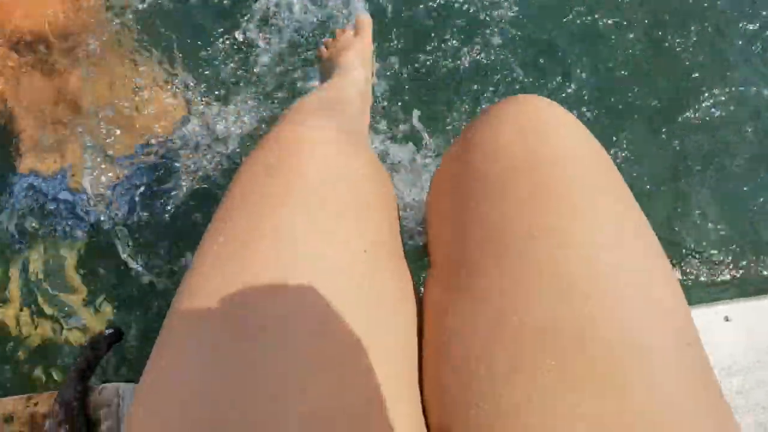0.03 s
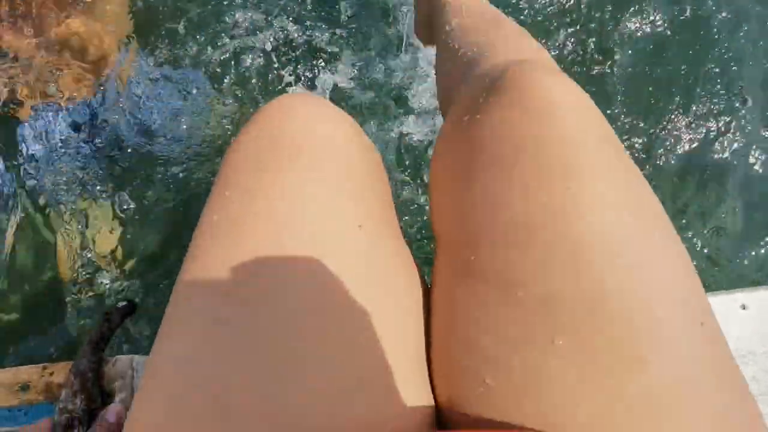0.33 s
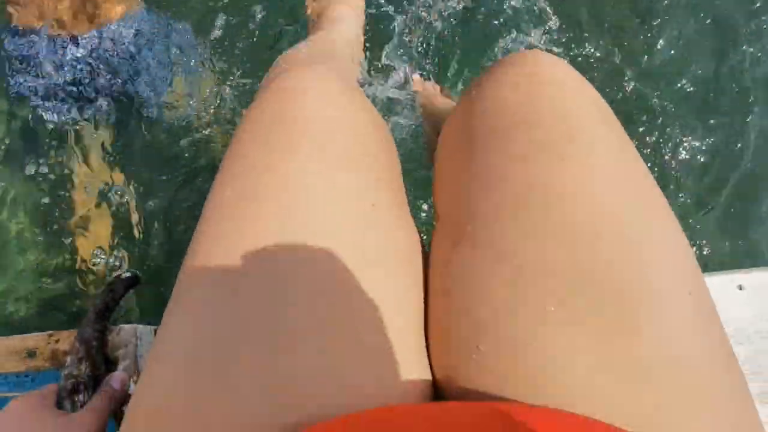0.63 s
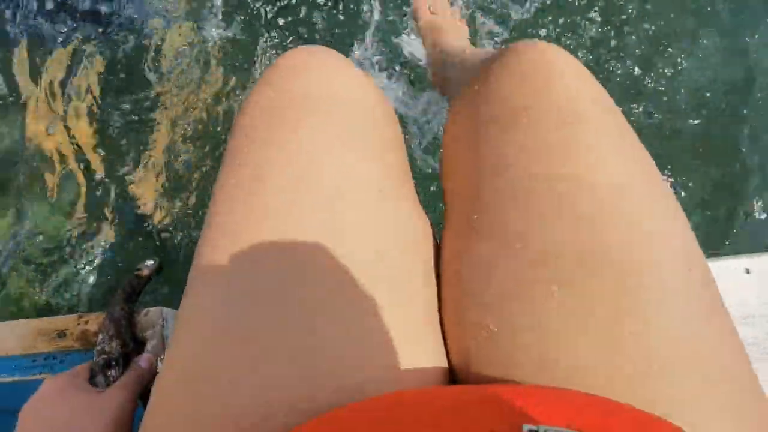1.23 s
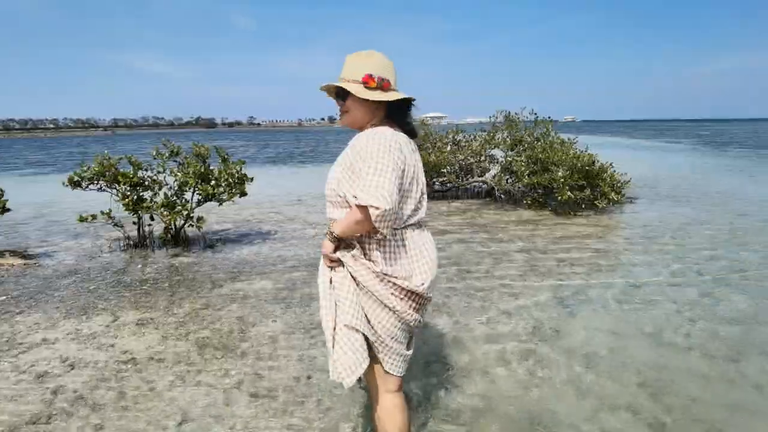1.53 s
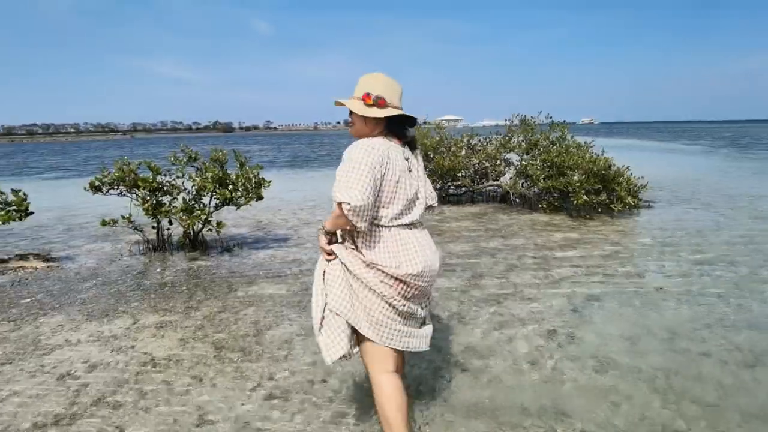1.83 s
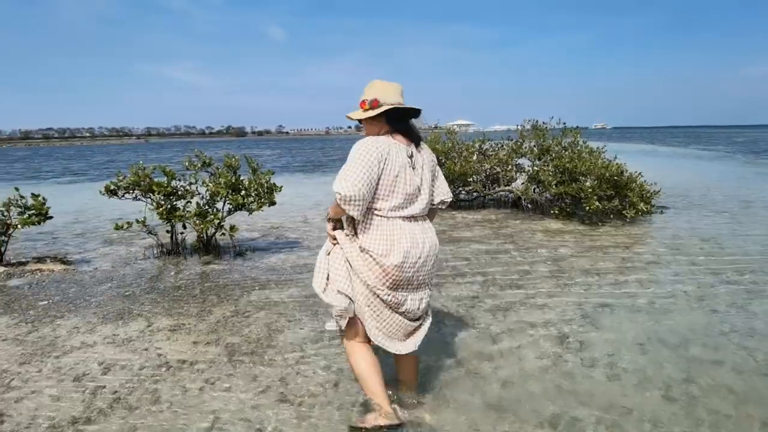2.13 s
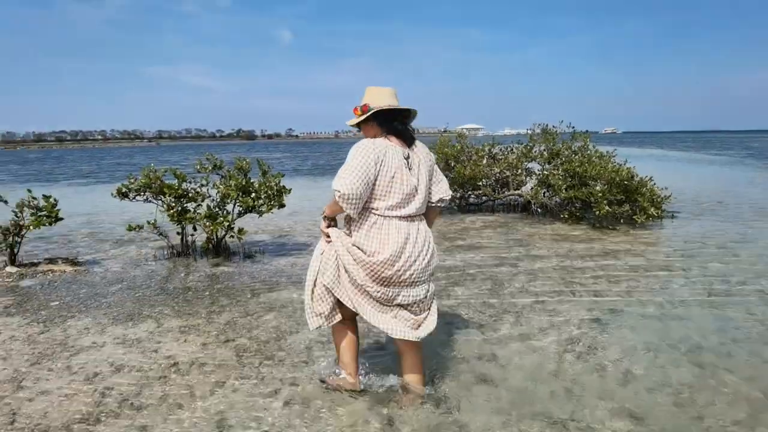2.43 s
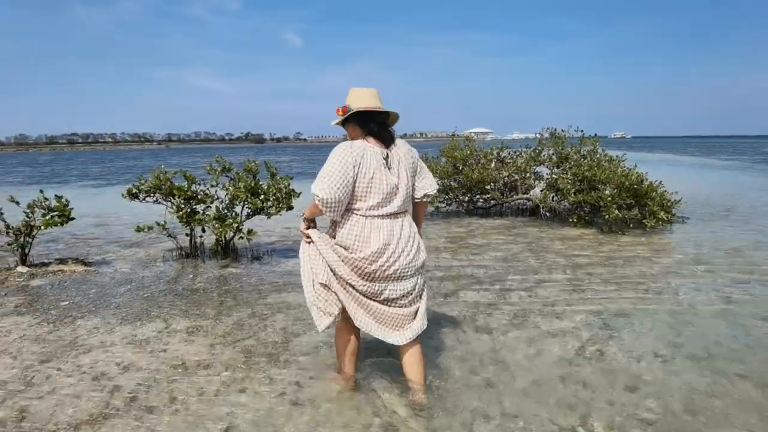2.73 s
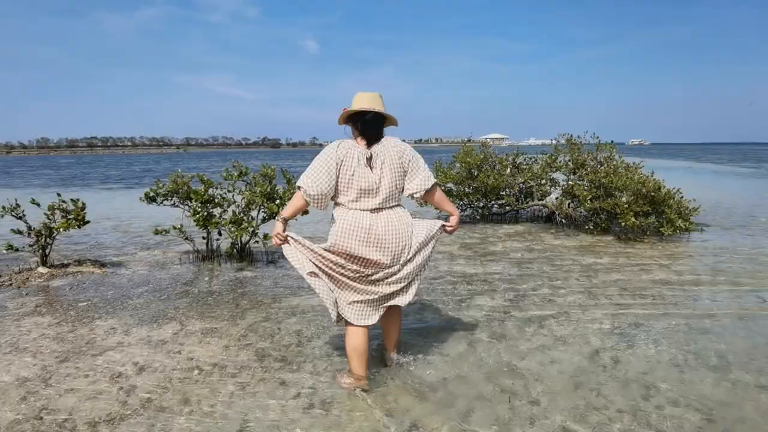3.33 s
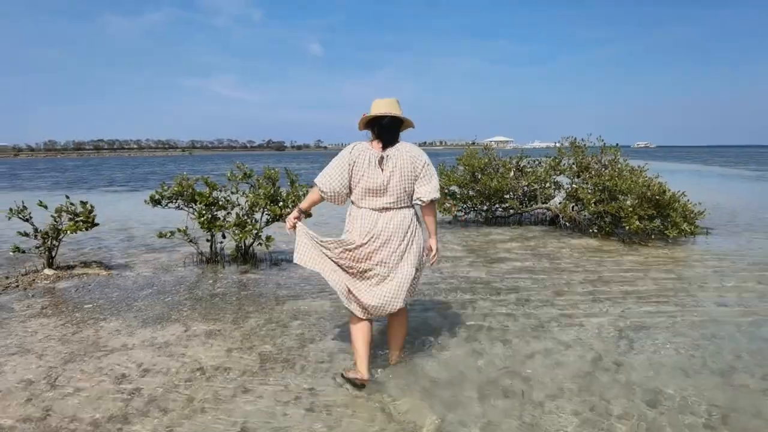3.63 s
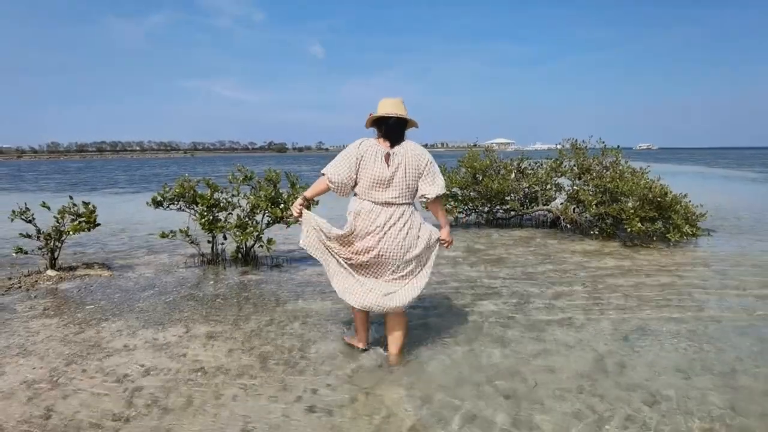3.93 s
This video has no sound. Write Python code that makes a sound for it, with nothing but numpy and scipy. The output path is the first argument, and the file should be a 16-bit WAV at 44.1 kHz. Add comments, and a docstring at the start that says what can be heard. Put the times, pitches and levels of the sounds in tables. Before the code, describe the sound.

Feet kick and splash in water close to the microphone, with spray, slapping drops and deep gulps. The sound then switches to several small boat engines chugging out of step across open water, over a low rumble and soft sea wash.

```python
"""Splashing feet and chugging boats

Feet kick in the water beside a boat: spray flies, drops slap, bubbles ring, plunging legs gulp air. Then the
scene changes: three one-cylinder boat engines chug across open water, each at its own speed, so their beats
drift through one another over a low rumble and the wash of the sea. Late on, the fastest engine fades and a
wading foot plops softly."""
import sys
import numpy as np
from scipy import signal
from scipy.fft import rfft, irfft, next_fast_len
from scipy.io import wavfile
from scipy.ndimage import uniform_filter1d

SR = 44100
rng = np.random.default_rng(int(sys.argv[2]) if len(sys.argv) > 2 else 0)


def to_wav(s):
    """Save 16-bit WAV."""
    ch = np.atleast_2d(s).T  # columns
    pcm = np.round(np.clip(ch, -1, 1) * 32767)  # PCM
    wavfile.write(sys.argv[1], SR, pcm.astype(np.int16))


N = 176400
WATER_END_S, ENGINES_START_S = 1.515, 1.522


# each kick (t/s, spray level/dB, bubbling level/dB, rise/s, hold/s, fall/s)
FOOT_KICKS = [(.0, -30, -34.5, .02, 0.031, 0.088), (0.051, -23.5, -27, .008, 0.01, 0.11),
              (0.211, -25.5, -31.5, 0.036, 0.017, 0.06), (0.25, -20.5, -31.5, .006, 0.0045, 0.025),
              (0.265, -30, -33.5, .03, 0.03, 0.26), (0.56, -23.5, -40.5, 0.011, 0.019, 0.038),
              (0.627, -28.5, -42.5, 0.0068, .006, 0.059), (0.69, -33.5, -37, 0.11, 0.044, 0.056),
              (0.765, -31.5, -41.5, 0.012, 0.025, 0.059), (0.825, -28.5, -34.5, 0.077, 0.057, 0.091),
              (0.909, -15.5, -27.5, 0.0081, .01, 0.047), (0.966, -26.5, -47, 0.011, 0.0045, 0.022),
              (1.062, -25, -38, 0.0044, .004, 0.032), (1.08, -20, -35.5, 0.0063, 0.008, 0.049),
              (1.247, -22.5, -36, 0.0048, 0.0066, 0.015), (1.269, -34, -42, 0.035, 0.032, 0.03),
              (1.368, -33, -48, 0.023, 0.013, 0.066), (1.41, -30.5, -39, 0.013, 0.016, 0.073)]
# tone colours, or how strong each pitch is, of spray and bubbling (f/Hz, level/dB)
SPRAY_COLOUR = [(1500, -29), (2600, -11.5), (3800, -15), (5500, -4), (8300, 4), (10000, -1.5),
                (12000, -15.5), (16000, -19)]
BUBBLING_COLOUR = [(250, -5), (450, -3.5), (750, -3), (1050, -7.5), (1700, 6), (2600, 0.5), (4000, -11.5)]
def kicks():
    """Each kick throws up a spray of tiny bubbles and stirs bigger, lower ones."""
    spray_power, bubbling_power = amp(-38) ** 2, amp(-46.5) ** 2  # trickle and lapping between kicks
    for s, spray_db, bubbling_db, rise, hold, fall in FOOT_KICKS:
        shape = burst(s, rise, hold, fall)
        spray_power += (amp(spray_db) * shape) ** 2
        bubbling_power += (amp(bubbling_db) * shape) ** 2
    tiny = bubbles(1800, 2180, 13200, cycles=2.84, spread_db=1.5, noise=0.41, samples=220)
    spray = stereo(coloured(patchy(tiny, depth_db=3), SPRAY_COLOUR), 0.18, 0.241)
    bigger = bubbles(380, 398.4, 3653, cycles=16.9, spread_db=2.5, noise=0.61, samples=1800)
    bubbling = stereo(coloured(bigger, BUBBLING_COLOUR), 0.25, 0.11)
    return np.sqrt(spray_power) * spray + np.sqrt(bubbling_power) * bubbling


# legs going under (t/s, level/dB, hold/s)
LEG_PLUNGES = [(.0, -27, 0.01), (0.076, -28.5, 0.056), (0.181, -38, 0.098), (0.333, -28, 0.017),
               (0.41, -27, 0.063), (0.508, -33, 0.09), (0.812, -36, 0.088), (0.953, -32.5, 0.047),
               (1.061, -28, 0.034), (1.14, -30.5, 0.085), (1.284, -32.5, 0.021)]
# tone colour of the gulp (f/Hz, level/dB)
GULP_COLOUR = [(25, -34), (60, -11), (120, -4), (200, -1), (330, -6), (600, -22), (1500, -48)]
def plunges():
    """A plunging leg drags air under, and the big bubbles make a deep gulp."""
    power = amp(-43) ** 2  # soft swell between plunges
    for s, db, hold in LEG_PLUNGES:
        power += (amp(db) * burst(s, rise=0.039, hold=hold, fall=0.076)) ** 2
    big = bubbles(250, 100.4, 428, cycles=4.76, spread_db=2, noise=0.6, samples=2600)
    return np.sqrt(power) * stereo(coloured(big, GULP_COLOUR), 0.28, 0.14) * pan(2)


# drops landing (t/s, level/dB)
DROP_SLAPS = [(0.0502, -14), (0.0782, -10), (0.25, -22), (.617, -11.5), (.621, -15), (.698, -15),
              (1.2456, -9), (1.251, -5.5), (1.388, -10)]
def drops(fade_s=0.013):
    """Falling drops slap the surface, each with a sharp burst of fizz."""
    slaps, t = np.zeros((3, N)), np.arange(SR // 10) / SR
    fizz = 0.5 * coloured(noises(), SPRAY_COLOUR)
    for s, db in DROP_SLAPS:
        add(slaps, s, amp(db - 60 * t / fade_s))
    return stereo(slaps * fizz, 0.2, 0.23) * pan(2)


# single bubbles and drips (t/s, f/Hz, level/dB)
BUBBLE_PLOPS = [(.232, 796, -27), (0.25, 2710, -16.5), (.268, 715, -23), (.365, 488, -21),
                (.713, 1360, -25), (0.736, 426, -23.5), (.847, 736, -21.5), (.912, 620, -26),
                (1.088, 345, -19.5), (1.146, 310, -19), (1.247, 315, -18.5), (1.411, 1580, -23.5),
                (1.465, 546, -26.5), (1.605, 5880, -19), (3.684, 1350, -31)]
def plops(fade_s=0.031, glide_per_s=1.2):
    """Single bubbles and drips ring briefly with a rising pitch."""
    rings, t = np.zeros(N), np.arange(SR // 10) / SR
    onset = 1 - np.exp(-t / 0.0018)
    for s, hz, db in BUBBLE_PLOPS:
        tone = np.sin(2 * np.pi * hz * t * (1 + glide_per_s * t / 2))
        add(rings, s, amp(db - 60 * t / fade_s) * onset * tone)
    return rings


# engine speeds, starting at the first firing (t/s, firings per second)
FAST_SPEED = [(1.5454, 21.77), (2.3, 25.152), (2.8, 25.276), (3.6, 20.854)]
MIDDLE_SPEED = [(1.5436, 21.38), (2.2, 21.265), (2.7, 19.076), (3.5, 17.552), (4, 17.814)]
SLOW_SPEED = [(1.6083, 13.315), (2.3, 13.757), (3.2, 13.265), (4, 13.226)]
# loudness; the "bite" is the exhaust's crack, knock and hiss (t/s, thump level/dB, bite level/dB)
FAST_LOUDNESS = [(1.55, -53, -59), (1.72, -17, -21.5), (2.0, -17, -15), (2.45, -12.5, -16),
                 (2.8, -16.5, -14), (3.05, -18.5, -22.5), (3.2, -17.5, -23.5), (3.3, -23, -23.5),
                 (3.6, -43, -39)]
MIDDLE_LOUDNESS = [(1.55, -16.5, -24.5), (1.85, -19.5, -26), (2.05, -11.5, -23.5), (2.25, -20, -22.5),
                   (2.5, -10, -20.5), (2.75, -15, -25.5), (3.0, -24.5, -50), (3.4, -12.5, -37.5),
                   (3.52, -20, -39), (4, -15.5, -61)]
SLOW_LOUDNESS = [(1.6, -19.5, -35), (1.9, -47, -29.5), (2.6, -17, -55), (2.85, -18.5, -28.5),
                 (3.15, -27.5, -31), (3.4, -22.5, -36.5), (3.799, -23, -35), (4, -19.5, -30.5)]
# notes each exhaust pipe rings at (f/Hz, level/dB, time to peak/ms)
FAST_NOTES = [(133, -5.5, 3), (195, -7, 2.35), (399, -9, 0.73)]
MIDDLE_NOTES = [(141.7, -1, 8.8), (106, -8, 7.9), (302, -21, 8.4)]
SLOW_NOTES = [(154.8, 1.5, 7.5), (97, -12.5, 6.1), (261, -8, 2.6)]
# tone colours of the crack and hiss (f/Hz, level/dB)
FAST_COLOUR = [(150, -12), (450, 6), (900, -18.5), (2000, -4), (3400, -23.5), (8000, -10), (16000, -44)]
MIDDLE_COLOUR = [(300, 8), (1000, -14.5), (1700, -0.5), (3200, -4), (4200, -13), (7200, 0), (10000, -13.5),
                 (12000, -29), (16000, -34)]
SLOW_COLOUR = [(300, 6.5), (1500, 2.5), (3600, -9), (6200, 1), (8000, 2), (11000, -13), (16000, -41)]
def boats(cut_hz=83.5):
    """Three engines chug out of step; their pipes give off little sound below cut_hz."""
    fast = engine(FAST_SPEED, FAST_LOUDNESS, FAST_NOTES, FAST_COLOUR, early_ms=1.33, roundness=0.95,
                  crack_db=-5, knock_db=-4, hiss_db=-6, hiss_ms=4.7, lead_ms=-0.41)
    middle = engine(MIDDLE_SPEED, MIDDLE_LOUDNESS, MIDDLE_NOTES, MIDDLE_COLOUR, early_ms=2.76,
                    roundness=4.6, crack_db=3, knock_db=-18.5, hiss_db=3, hiss_ms=7.94, lead_ms=0.285)
    slow = engine(SLOW_SPEED, SLOW_LOUDNESS, SLOW_NOTES, SLOW_COLOUR, early_ms=2.14, roundness=1.8,
                  crack_db=-19, knock_db=-7, hiss_db=5, hiss_ms=6.15, lead_ms=0.338)
    return filtered(fast + middle + slow, lambda hz: 1 - 1 / (1 + (hz / cut_hz) ** 6))


# notes of the short knock at a pipe's mouth (f/Hz, level/dB, time to peak/ms)
KNOCK_NOTES = [(523, -10, 0.67), (1428, -2.5, 0.51), (1955, -12, 0.77)]
def engine(speed, loudness, notes, colour, early_ms, roundness,
           crack_db, knock_db, hiss_db, hiss_ms, lead_ms):
    """Each firing thumps in the exhaust pipe, knocks, cracks and lets out a ragged hiss of gas."""
    thumps, bites = firings(speed, loudness)
    early = int(early_ms * SR / 1000)  # thump and hiss start just before the crack
    thump = ring(np.roll(thumps, -early), notes, roundness, wander=0.012)
    echo_delay = int(0.01977 * SR)
    thump += amp(-16) * np.pad(thump, (echo_delay, 0))[:N]
    knock = amp(knock_db) * ring(bites, KNOCK_NOTES, roundness=0.68, wander=0.09)
    crack = amp(crack_db) * signal.fftconvolve(bites, -click(colour))[:N]
    ms = np.arange(SR // 8) * 1000 / SR
    puff = (1 - np.exp(-(ms / 1.6) ** 2)) * np.exp(-ms / hiss_ms)
    puffs = signal.fftconvolve(bites, puff)[early:early + N]
    ragged = amp(2 * unit(uniform_filter1d(rng.standard_normal(N), size=60)))
    gas = coloured(patchy(ragged * noises(), depth_db=5.5), colour)
    hiss = stereo(amp(hiss_db) * puffs * gas, 0.56, lead_ms)
    return stereo(np.array([thump + knock + crack] * 3), 0.98, lead_ms) * pan(-1) + hiss


SCATTER_DB = 0.97  # random change in level from firing to firing
def firings(speed, loudness):
    """Two rows of spikes, one spike per firing: thump sizes and bite sizes."""
    t = clock()
    cycles = np.cumsum(curves(speed, t)[0] * (t >= speed[0][0])) / SR
    at = np.flatnonzero(np.diff(np.ceil(cycles)) > 0)
    spikes = np.zeros((2, N))
    spikes[:, at] = amp(curves(loudness, t[at]) + SCATTER_DB * rng.standard_normal((len(at), 2)).T)
    return spikes


def ring(spikes, notes, roundness, wander):
    """Each spike makes a pipe's notes swell and fade, never at quite the same pitch or level."""
    out, t = np.zeros(N), np.arange(SR // 8) / SR
    for i in np.flatnonzero(spikes):
        for hz, db, peak_ms in notes:
            detune, louder = rng.standard_normal(2)
            age = 1000 * t / peak_ms
            swell = amp(db + SCATTER_DB * louder) * (age * np.exp(1 - age)) ** roundness
            tone = np.sin(2 * np.pi * hz * (1 + wander * detune) * t)
            add(out, i / SR, -spikes[i] * swell * tone)
    return out


# how long the echo lasts (f/Hz, time to fade by 60 dB/s)
SHORE_FADE = [(100, 0.34), (500, 0.3), (2000, 0.18), (10000, 0.087)]
def shore(engines):
    """Hulls and shore send back a short, blurred echo, longest in the bass."""
    hz, t, spectrum = signal.stft(rng.standard_normal((3, SR // 3)), SR, nperseg=256)
    fade = amp(-60 * t / along(SHORE_FADE, hz)[:, None])
    tail = signal.istft(spectrum * fade, SR, nperseg=256)[1]
    tail = np.pad(tail / np.linalg.norm(tail[0]), ((0, 0), (SR // 100, 0)))  # arrives 10 ms late
    return amp(-10.5) * stereo(signal.fftconvolve(engines[:1], tail, axes=1)[:, :N], 0.53, 0)


# tone colour of the rumble (f/Hz, level/dB)
RUMBLE_COLOUR = [(25, -40), (58, -17), (105, 3), (160, 7.5), (260, -4), (480, -11), (1500, -51.5)]
def rumble(engines, smooth_s=0.036):
    """A steady low rumble that swells with the engines' thumps."""
    loudness = np.sqrt(np.abs(uniform_filter1d(engines[0] ** 2, int(smooth_s * SR))))
    return (amp(-38.5) + amp(-10.5) * loudness) * stereo(coloured(noises(), RUMBLE_COLOUR), 0.39, 0)


# loudness of the sea (t/s, level/dB)
SEA_LOUDNESS = [(1.55, -41.5), (1.9, -43.5), (2.5, -35), (3.1, -46), (4, -43.5)]
# its tone colour (f/Hz, level/dB)
SEA_COLOUR = [(400, 8), (1000, 1), (1900, -0.5), (4000, -5.5), (6000, 0), (8200, 0.5), (10000, -5.5),
              (12000, -16.5), (16000, -26)]
def sea():
    """The wash of the sea, a soft noise that slowly rises and falls."""
    return amp(curves(SEA_LOUDNESS, clock())[0]) * stereo(coloured(noises(), SEA_COLOUR), 0.11, 0.257)


def bubbles(per_s, lo_hz, hi_hz, cycles, spread_db, noise, samples):
    """Three streams of bubbles over noise; each bubble rises in pitch as it dies away."""
    t, streams = np.arange(samples) / SR, []
    for _ in range(3):
        when, pitch, size = rng.random((int(per_s * WATER_END_S), 3)).T[:, :, None]
        hz = lo_hz * (hi_hz / lo_hz) ** pitch
        age = hz * t / cycles
        strength = amp(-spread_db * np.log(0.02 + 0.98 * size))  # many quiet, a few loud
        glide = 1 + 0.1 * np.minimum(age, 2)
        tones = strength * np.exp(-3 * age) * np.sin(2 * np.pi * hz * t * glide)
        at = (when * WATER_END_S * SR).astype(int) + np.arange(samples)
        stream = np.bincount(at.ravel(), tones.ravel(), N)[:int(WATER_END_S * SR)]
        streams.append(unit(np.resize(stream, N)) + noise * rng.standard_normal(N))
    return np.array(streams)


def burst(s, rise, hold, fall):
    """A swell that peaks at time s; rise and fall are the seconds it takes to change by 20 dB."""
    t = clock() - s
    return amp(-20 * np.minimum(np.maximum(-t, 0) / rise + np.maximum(t - hold, 0) / fall, 10))


def patchy(x, depth_db):
    """Make random pitches in x briefly louder or softer."""
    spectrum = signal.stft(x, nperseg=384)[2]
    patches = uniform_filter1d(rng.standard_normal(spectrum.shape[1:]), size=3, axis=0)
    patches = unit(uniform_filter1d(patches, size=3, axis=1))
    return signal.istft(spectrum * amp(depth_db * patches), nperseg=384)[1][:, :N]


def click(colour, size=1024):
    """A click with a tone colour and a peak of 1."""
    cepstrum = irfft(np.log(amp(along(colour, np.fft.rfftfreq(size, 1 / SR)))))
    cepstrum[1:size // 2] *= 2  # these two lines pack the sound at the start
    cepstrum[size // 2 + 1:] = 0
    pulse = irfft(np.exp(rfft(cepstrum)))
    return pulse / np.abs(pulse).max()


def stereo(three, alike, lead_ms):
    """Both sides share the first stream, the left lead_ms sooner; each also gets one of its own."""
    shared = filtered(three[0], lambda hz: np.exp(1j * np.pi * hz * lead_ms / 1000 * [[1], [-1]]))
    return np.sqrt(alike) * shared + np.sqrt(1 - alike) * three[1:]


def pan(db):
    """Gains that make the left side db louder than the right."""
    return amp(db * np.array([[0.5], [-0.5]]))


def filtered(x, response):
    """Scale each frequency in x by response(hz)."""
    size = next_fast_len(N + SR // 2)
    return irfft(rfft(x, size) * response(np.fft.rfftfreq(size, 1 / SR)), size)[..., :N]


def coloured(x, colour):
    """Give x a tone colour and an average strength of 1."""
    return unit(filtered(x, lambda hz: amp(along(colour, hz))))


def along(points, hz):
    """Read a frequency table at hz, on a log scale."""
    f, values = np.transpose(points)
    return np.interp(np.log(hz + 1), np.log(f + 1), values)


def curves(rows, t):
    """Read each column of a time table at the times t."""
    s, *columns = np.transpose(rows)
    return np.array([np.interp(t, s, column) for column in columns])


def add(track, s, sound):
    """Mix a sound in at s seconds."""
    i = int(np.clip(round(s * SR), 0, N - 1))
    track[..., i:i + sound.shape[-1]] += sound[..., :N - i]


def amp(db):
    return 10 ** (np.asarray(db) / 20)


def unit(x):
    return x / np.sqrt(np.mean(x ** 2) + 1e-20)


def clock():
    return np.arange(N) / SR


def noises():
    return rng.standard_normal((3, N))


# the finest spray is louder on the left (f/Hz, left minus right level/dB)
WATER_PAN = [(3500, 2), (8000, -1), (12500, 12.5)]
def scene():
    """The splashing fades out, then the engines come in."""
    t = clock()
    water = filtered(kicks() + plunges() + drops(), lambda hz: pan(along(WATER_PAN, hz)))
    engines = boats()
    open_water = engines + rumble(engines) + sea() + shore(engines)
    fade_out = np.clip((WATER_END_S - t) / 0.051, 0, 1)
    fade_in = np.clip((t - ENGINES_START_S) / 0.01, 0, 1)
    return water * fade_out + open_water * fade_in + plops()


def record(dry):
    """Cut off the very highest treble."""
    return filtered(dry, lambda hz: hz < 16100)


dry = scene()
out = record(dry)
to_wav(out)
```